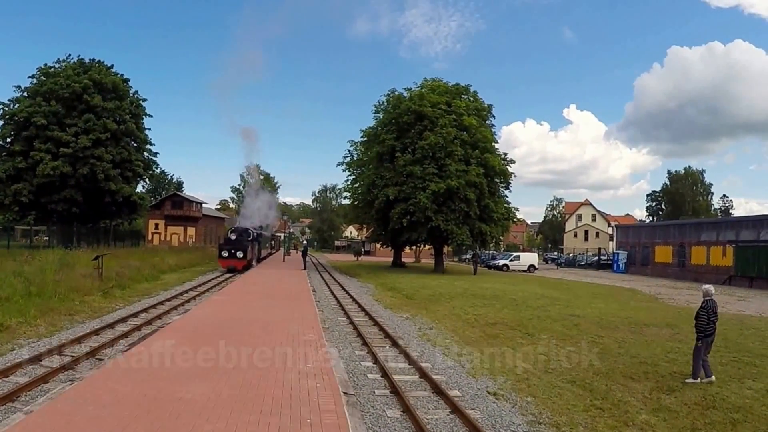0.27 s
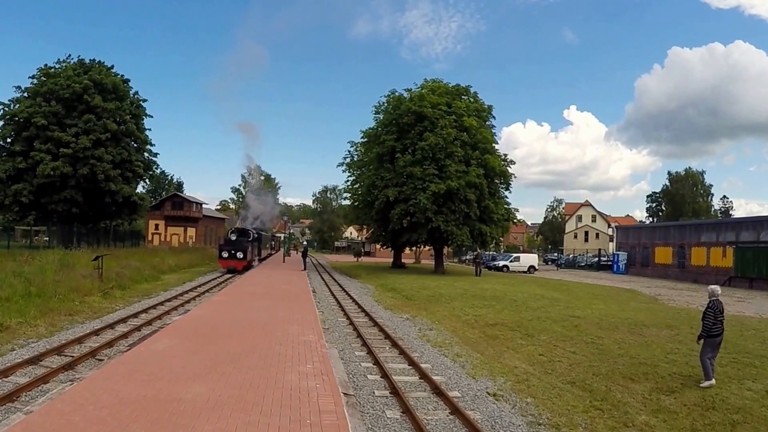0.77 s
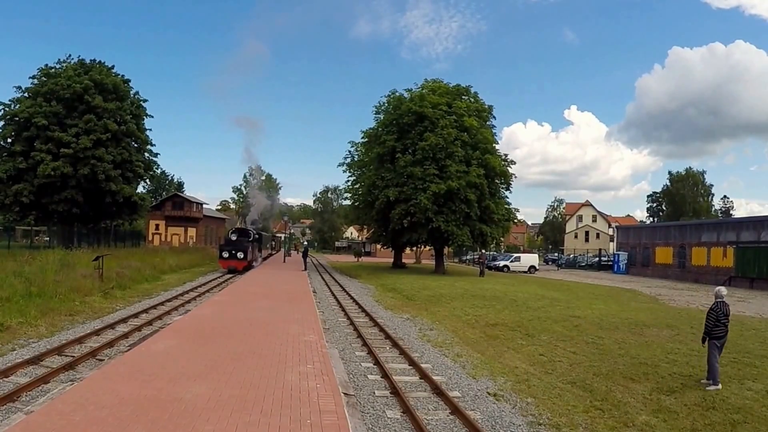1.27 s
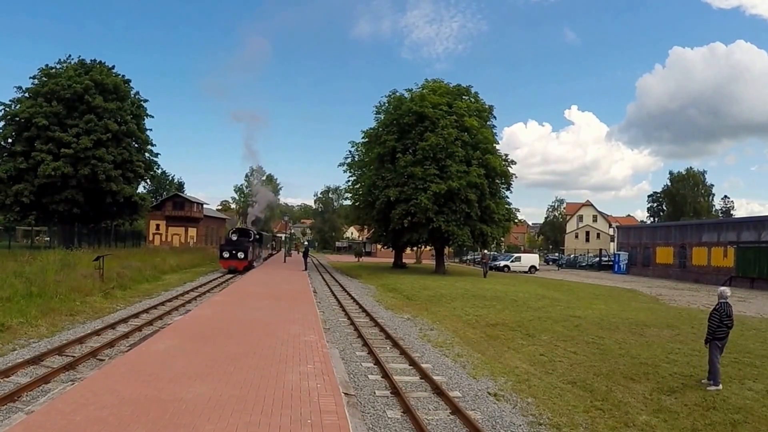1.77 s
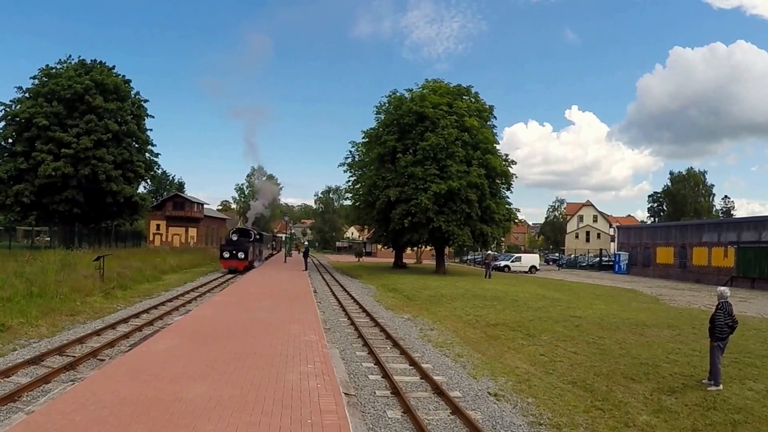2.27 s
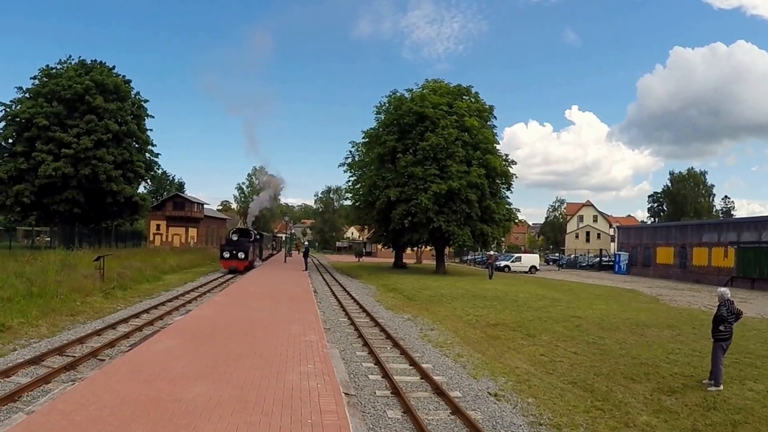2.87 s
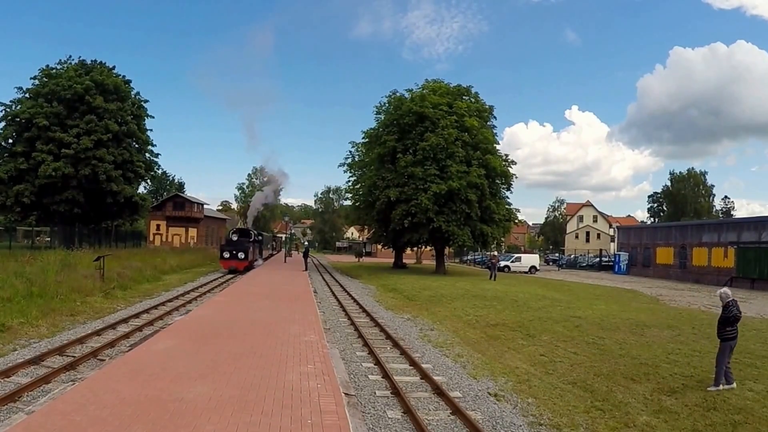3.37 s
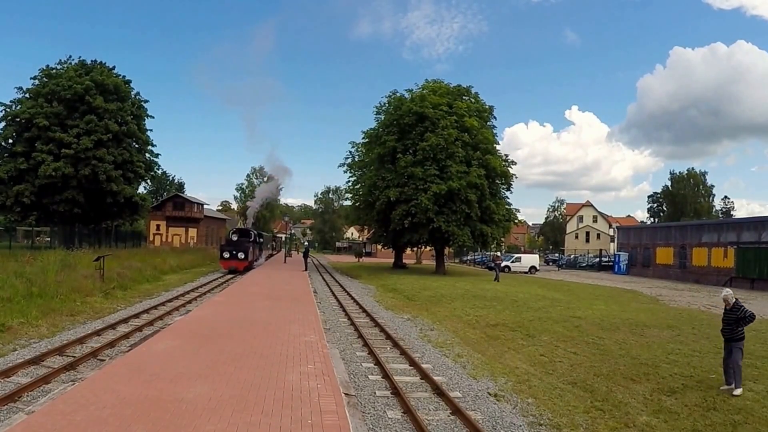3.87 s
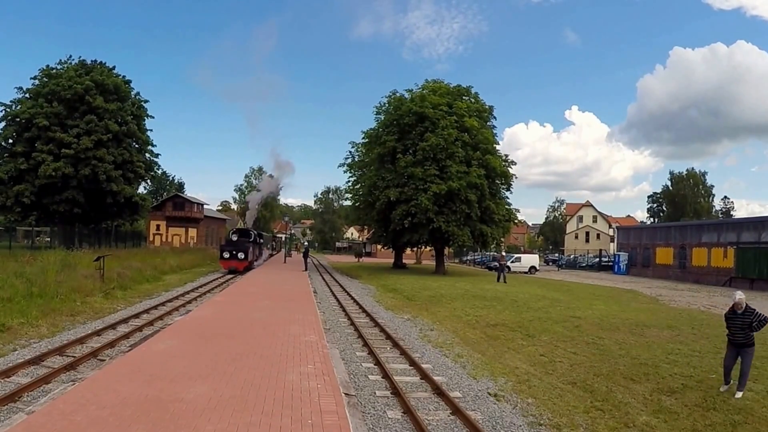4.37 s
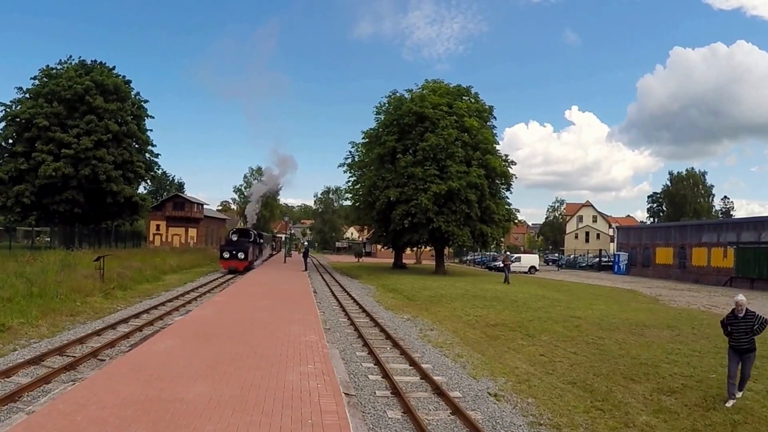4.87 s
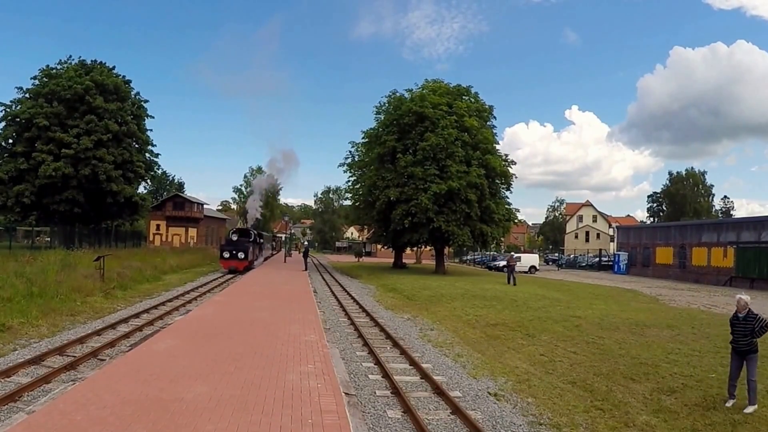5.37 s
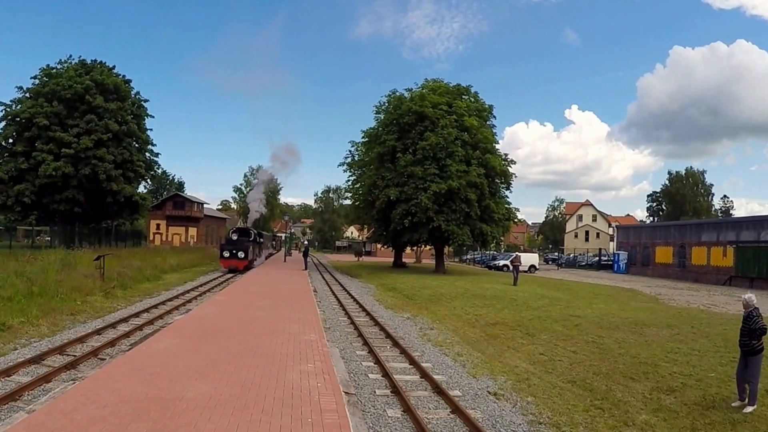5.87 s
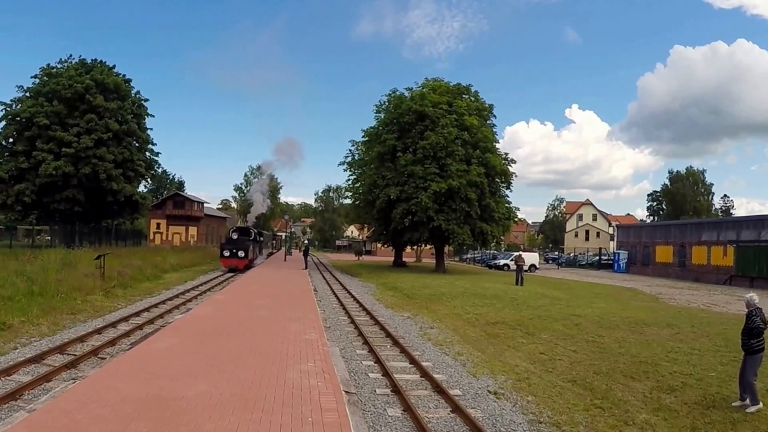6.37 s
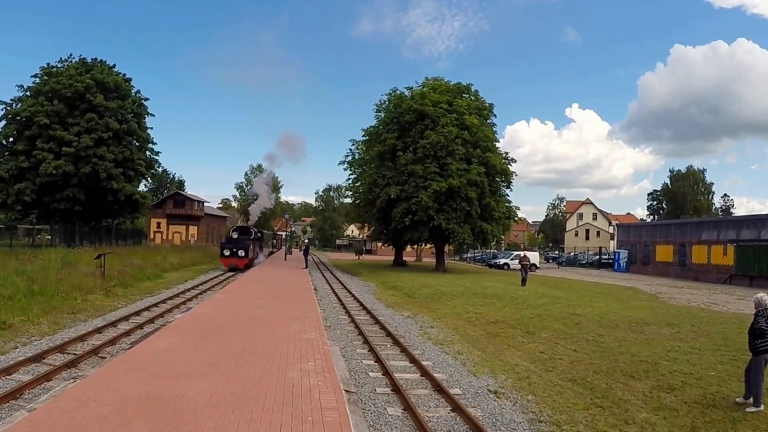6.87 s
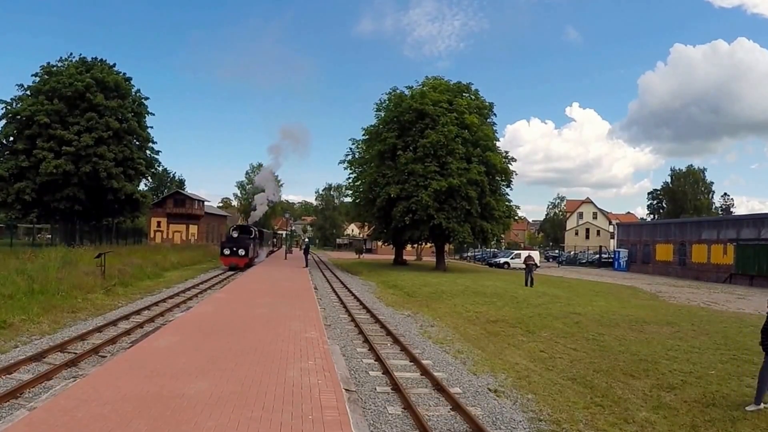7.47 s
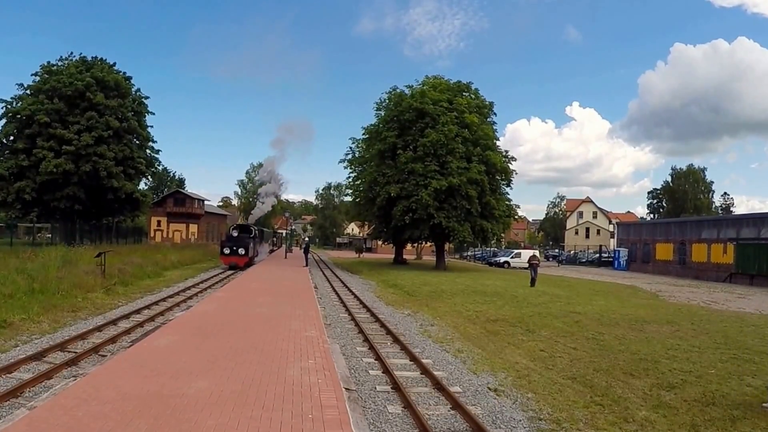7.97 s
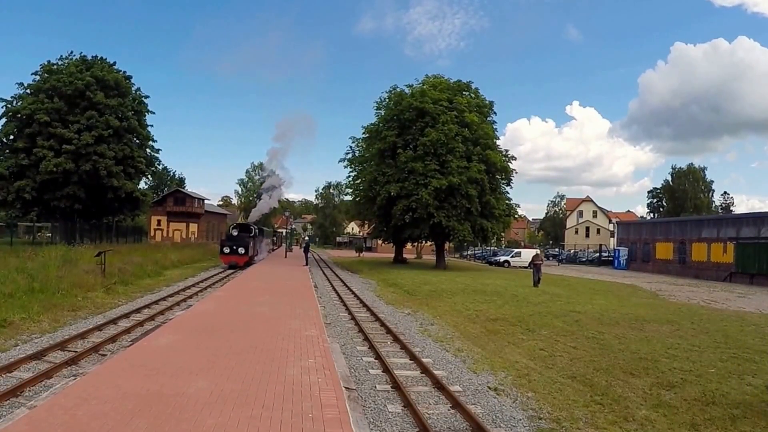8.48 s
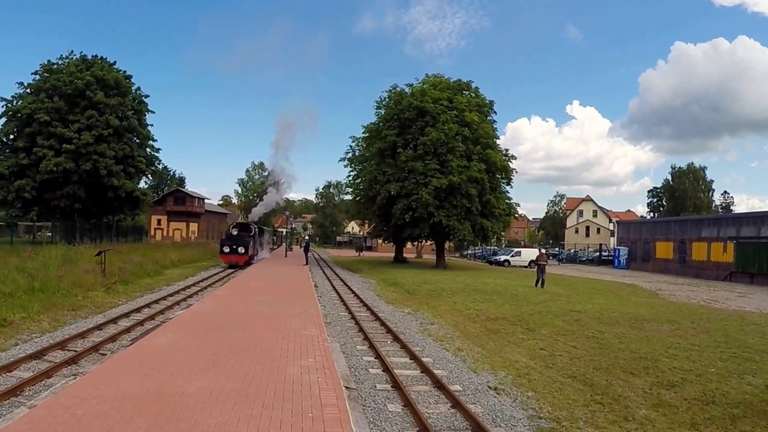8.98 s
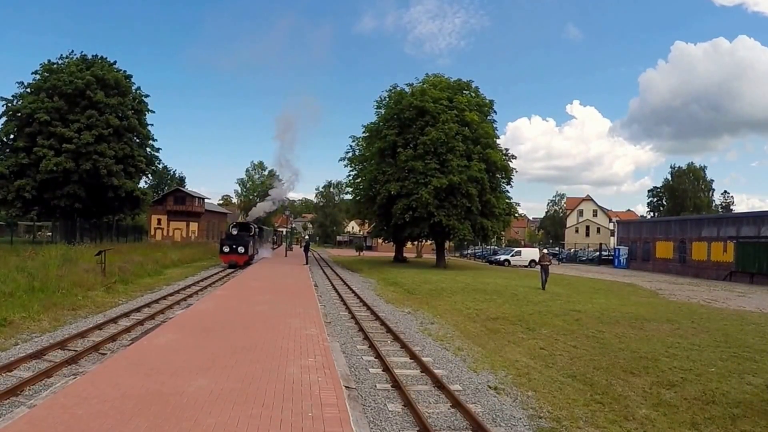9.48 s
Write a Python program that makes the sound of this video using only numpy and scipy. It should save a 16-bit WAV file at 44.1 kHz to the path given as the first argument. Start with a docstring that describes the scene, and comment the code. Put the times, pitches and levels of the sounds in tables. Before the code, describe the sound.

Outdoors at a small country station, strong wind hits an unprotected microphone: deep uneven rumble, fluttering puffs and sharp snaps, worst in the first three seconds, with a hoarse sliding howl near the end of that burst. At the start a far steam whistle's echo fades within a second. Later the wind softens to low thumps, a bird chirps briefly, and the distant locomotive's steady hiss slowly rises.

```python
"""A small country station on a gusty day, with a steam locomotive far down the platform.
Wind on the bare microphone leads: turbulent rumble in noise bands, bright puffs of frozen eddies blown past,
snaps as single pressure pulses, and now and then a rough howl of narrow sliding noise.
Behind it a whistle's echo dies away in resonant noise and jet-noise steam swells as the train rolls nearer.
A bird slurs a few falling sines over a far murmur of shaped noise."""
import sys
import numpy as np
from scipy import signal
from scipy.fft import rfft, irfft, next_fast_len
from scipy.io import wavfile
from scipy.ndimage import uniform_filter1d

SR = 44100
rng = np.random.default_rng(int(sys.argv[2]) if len(sys.argv) > 2 else 0)


def pcm_store(signal):
    """Save signal as 16-bit PCM."""
    levels = np.round(np.clip(np.atleast_2d(signal), -1, 1) * 32767)
    wavfile.write(sys.argv[1], SR, levels.astype(np.int16).T)


N = 429534
REACH_HZ_PER_SPEED = 200    # frequency scale of the eddies [Hz per m/s of air speed]


def from_db(db):
    """Level definition: decibels to amplitude gain."""
    return 10 ** (np.asarray(db) / 20)


def rms_one(x):
    """Normalisation of a signal to unit mean power."""
    return x / np.sqrt(np.mean(x ** 2) + 1e-20)


def in_time(rows):
    """Linear interpolation: each column of a table as one value a sample."""
    times, *columns = np.transpose(rows)
    return [np.interp(np.arange(N) / SR, times, column) for column in columns]


def drift(rate_hz):
    """Low-pass random process: noise through two equal poles with corners at rate_hz, unit power."""
    step = 40   # samples between computed values
    r = np.exp(-2 * np.pi * rate_hz * step / SR)
    white = rng.standard_normal(N // step + 2002)
    slow = signal.lfilter([1], [1, -2 * r, r * r], white)[2000:]    # the filter's start is dropped
    return np.interp(np.arange(N) / step, np.arange(len(slow)), rms_one(slow))


def coloured(points):
    """Spectral shaping: stationary noise with the given spectrum, unit power."""
    size = next_fast_len(N)
    hz = np.maximum(np.arange(size // 2 + 1) * SR / size, 1)
    points_hz, points_db = np.transpose(points)
    gain = from_db(np.interp(np.log(hz), np.log(points_hz), points_db, left=-120, right=-120))
    return rms_one(irfft(rfft(rng.standard_normal(size)) * gain, size)[:N])


def filtered(x, order, hz, kind):
    """Butterworth filtering: flat pass band, with its corner or corners at hz."""
    return signal.sosfilt(signal.butter(order, hz, kind, fs=SR, output="sos"), x)


STEADY_SHARE, STEADY_MAX_SPEED = 0.34, 2.8     # steady flow against eddy speed; upper limit [m/s]


def rumble(lumps_db, gusty):
    """Turbulent pressure on the microphone: faster air carries the noise spectrum to higher frequencies."""
    level_db, speed = air()
    gust = np.tanh(1.01 * drift(24.3) + 0.55 * drift(67.4))
    # faster air comes only as puffs
    steady_speed = np.minimum(STEADY_SHARE * speed, STEADY_MAX_SPEED)
    reach_hz = REACH_HZ_PER_SPEED * steady_speed * np.exp(gusty * gust)
    white = rng.standard_normal((2, N + SR))
    edges = 14 * 2 ** np.arange(0, 8, .5)   # half-octave bands
    out = 0
    for k, (low, high) in enumerate(zip(edges, edges[1:])):
        # neighbouring bands draw on separate noises
        band = filtered(white[k % 2], 3, [low, high], "band")[SR:]
        # the size of the housing keeps the spectrum flat up to 38 Hz
        above_hz = max(np.sqrt(low * high) - 38, 0)
        out = out + band * from_db(-30 * above_hz / reach_hz + lumps_db * drift(10.9))
    # 32 dB makes up for the narrow share of the noise that passes
    return from_db(level_db + 32) * out


# the breeze under the gusts: (time [s], level [dB], air speed [m/s])
BREEZE = [(0, -24.5, 3.25), (3, -26, 3.68), (5, -30, 1.73), (5.2, -30.5, 1.8), (5.36, -32, 0.77),
          (5.7, -28, 1.47), (7.3, -27, 1.7), (7.5, -33, 1.27), (8.6, -30.5, 1.3), (8.95, -28.5, 2.4),
          (9.45, -24, 1.25), (9.6, -38.5, 1.2), (9.74, -29.5, 1.1)]
# gusts at full strength: (start [s], length [s], level [dB], air speed of their eddies [m/s])
GUSTS = [(0, 0.31, -18, 4.96), (0.351, 0.13, -15.5, 7.05), (.56, 0.043, -19, 3.9), (0.617, .16, -19.5, 8.1),
         (0.804, 0.44, -19, 6.8), (1.295, 0.29, -22.5, 8.8), (1.618, 0.41, -21.5, 8.66),
         (2.057, 0.28, -19.5, 4.38), (2.411, 0.23, -19, 4.8), (2.595, .11, -24.5, 11.7),
         (2.757, .08, -22.5, 13), (2.852, 0.23, -19.5, 8.3), (3.137, 0.14, -27, 5.25),
         (3.293, 0.19, -30, 3.1), (3.455, 0.28, -21, 5), (3.769, 0.16, -26.5, 2.7),
         (3.92, 0.099, -22.5, 4.8), (4.044, .37, -21, 3.64), (4.465, 0.18, -22, 2.66),
         (4.692, 0.18, -20.5, 3.2), (4.87, .17, -25, 3.1), (5.045, 0.069, -13.5, 3.06),
         (5.381, 0.28, -21, 4.8), (5.744, 0.07, -17.5, 3.7), (5.857, 0.11, -29.5, 4.3),
         (6.005, 0.18, -17.5, 3.6), (6.327, 0.038, -15, 2.5), (6.452, 0.11, -16, 2.47),
         (6.601, 0.12, -17, 3.2), (6.774, 0.21, -28, 3.3), (7.084, 0.098, -20, 2.15),
         (7.224, 0.16, -13.5, 2.52), (7.614, 0.088, -21.5, 2.9), (7.71, 0.073, -24, 1.9),
         (7.904, .2, -23.5, 2.06), (8.397, 0.18, -21.5, 0.96), (8.739, 0.14, -16.5, 3.27),
         (8.968, 0.42, -17.5, 2.9)]
GUST_RISE_S, GUST_FALL_S = .025, 0.0406     # before the full strength and after it


def air():
    """Addition of powers: gusts rise, hold and fall over the breeze; speed is the power-weighted mean."""
    t = np.arange(N) / SR
    breeze_db, breeze_speed = in_time(BREEZE)
    power = from_db(breeze_db) ** 2
    flow = power * breeze_speed
    for start, length, level_db, speed in GUSTS:
        rise = (t - start) / GUST_RISE_S + 1
        fall = (start + length - t) / GUST_FALL_S + 1
        shape = np.clip(np.minimum(rise, fall), 0, 1)
        gust_power = (from_db(level_db) * shape ** 2) ** 2
        power = power + gust_power
        flow = flow + gust_power * speed
    return 10 * np.log10(power), flow / power


def scattered(gap_s, full_db, db_per_doubling, full_speed, spread_db):
    """Jittered point process: time, level that falls in slower air, air speed and a length factor."""
    lots = rng.standard_normal((int(N / SR / gap_s) - 2, 4))
    times = gap_s * (np.arange(len(lots)) + 1.5 + .5 * np.tanh(lots[:, 0]))
    speed = air()[1][(times * SR).astype(int)]
    # no further rise in level above full_speed
    level_db = full_db + db_per_doubling * np.log2(np.minimum(speed / full_speed, 1))
    level_db = level_db + spread_db * lots[:, 1]
    return times, level_db, speed * np.exp(0.2483 * lots[:, 2]), np.exp(0.297 * lots[:, 3])


# puffs of air at set times, strong and faint:
# (time of centre [s], level [dB], length at half power [s], nominal air speed [m/s])
SET_PUFFS = [(0.023, -8, 0.0094, 6.2), (0.047, -8, 0.0072, 5.5), (0.129, -21.5, 0.034, 5.5),
             (0.197, -16.5, 0.016, 5.1), (0.369, -11.5, .009, 4.1), (0.464, -8.5, 0.013, 3.9),
             (0.657, -14, .012, 8.7), (0.698, -15, .016, 6.9), (0.719, -4.5, 0.0086, 9.3),
             (0.748, -5, 0.016, 4.4), (0.771, -5, 0.0084, 3.4), (0.809, -18, .011, 8.5),
             (0.858, -12, .009, 8.8), (0.988, -12.5, 0.036, 6.05), (1.135, -25, 0.016, 10.5),
             (1.236, -9, .011, 3.93), (1.324, -26, .013, 9.2), (1.479, -8, 0.024, 7.5),
             (1.507, -9.5, 0.0038, 10.5), (1.643, -21, 0.009, 7.4), (1.699, -12, .011, 6.1),
             (1.754, -18, 0.019, 8.2), (1.787, -14.5, 0.02, 10.1), (1.885, -15, 0.0089, 6.2),
             (1.912, -13, .023, 8.2), (2.244, -16, 0.014, 6.2), (2.38, -21, 0.0078, 6),
             (2.537, -8.5, 0.0083, 4.4), (2.611, -11, 0.03, 12.9), (2.653, -11.5, 0.015, 16.9),
             (2.688, -6.5, 0.012, 13.4), (2.712, -8.5, 0.017, 10.9), (2.773, -7, 0.024, 13),
             (2.804, -8.5, 0.032, 12.5), (2.862, -4.5, .021, 6.9), (2.906, -16.5, 0.019, 12.3),
             (2.951, -6, 0.022, 8.8), (2.992, -10, 0.018, 8.4), (3.043, -7, 0.023, 8.35),
             (3.105, -11.5, .015, 8.7), (3.156, -11.5, 0.025, 3.7), (3.194, -11.5, 0.01, 3.7),
             (3.243, -13, .014, 5.36), (3.472, -22, 0.0093, 2.7), (3.505, -10.5, 0.024, 5.6),
             (3.556, -10, 0.021, 4.7), (3.711, -10, .014, 6.65), (3.987, -8, 0.015, 3.97),
             (4.008, -13, 0.016, 4.5), (4.237, -15, .045, 2.4), (4.371, -9.5, .026, 3.25),
             (4.706, -15.5, 0.023, 2.9), (4.8, -12.5, 0.034, 4.2), (4.927, -16, 0.012, 2.76),
             (5.103, -20, 0.0083, 5), (5.385, -25, 0.0071, 3.8), (5.417, -13.5, 0.02, 6.7),
             (5.438, -12, 0.011, 5.2), (5.455, -15, 0.0107, 7.35), (5.491, -12.5, .016, 5.05),
             (5.553, -21, .016, 4.8), (5.583, -24, 0.015, 6.3), (5.622, -17.5, 0.033, 5.9),
             (5.864, -14, 0.017, 5.7), (5.931, -13.5, 0.03, 3.2), (5.975, -14.5, 0.023, 2.34),
             (6.17, -12, .013, 3.92), (6.33, -9, 0.019, 2.93), (6.64, -20, 0.02, 3.16),
             (6.721, -19.5, .026, 4.35), (6.887, -14, 0.014, 2.48), (6.944, -18.5, 0.037, 3.6),
             (7.017, -15, 0.012, 3.3), (7.108, -17, 0.015, 2.9), (7.64, -24, 0.021, 2.76),
             (8.082, -18, .024, 1.55), (8.787, -15, .017, 4), (8.821, -20, 0.0093, 5.5),
             (9.19, -14.5, 0.015, 3.46), (9.252, -27, .017, 2.4), (9.342, -7.5, 0.014, 2.7)]
# chance puffs follow one another unevenly all the time, louder in fast air:
# mean gap [s], mean level in full-speed air [dB], its slope [dB per doubling of speed]
PUFF_GAP_S, PUFF_DB, PUFF_DB_PER_DOUBLING = .019, -19.5, 14.5
# full speed [m/s], spread of levels [dB], median length [s]
PUFF_FULL_SPEED, PUFF_SPREAD_DB, PUFF_S = 5.1, 4, .011


def puffs(swell, jitter, sharp_db, sharp_share):
    """Frozen turbulence: a fixed row of eddies is blown past; pitch and level follow the air speed."""
    out = np.zeros(N)
    fine, size = 32, 2 ** 13    # points per unit of eddy phase; points in the row
    pitch = np.arange(size // 2 + 1) * fine / size      # in units of the reach
    broad = from_db(-45 * pitch ** 1.5) * pitch / (pitch + .1)
    sharp = from_db(sharp_db - 36 * pitch) * pitch / (pitch + .2)
    jerks = np.exp(jitter * np.tanh(drift(78.3)))     # the air speed never holds still
    times, levels_db, speeds, stretch = scattered(
        PUFF_GAP_S, PUFF_DB, PUFF_DB_PER_DOUBLING, PUFF_FULL_SPEED, PUFF_SPREAD_DB)
    chance_puffs = zip(times, levels_db, PUFF_S * stretch, speeds)
    for time, level_db, length, speed in [*SET_PUFFS, *chance_puffs]:
        # dense broad eddies, and among them lone tight ones that crackle
        dense, sizes, lots = rng.standard_normal(size), rng.standard_normal(size), rng.random(size)
        lone = sizes * (lots < sharp_share) / np.sqrt(sharp_share)
        eddies = irfft(rfft(dense) * broad + rfft(lone) * sharp, size)
        half = int(1.05 * length * SR)
        at = round(time * SR) - half + np.arange(2 * half)
        inside = (at >= 0) & (at < N)
        at, bump = at[inside], np.hanning(2 * half)[inside]
        speed_now = speed * jerks[at] * (1 - swell + swell * bump)
        place = np.cumsum(REACH_HZ_PER_SPEED * speed_now) * fine / SR
        passing = np.interp(place % size, np.arange(size), eddies)
        out[at] += from_db(level_db) * rms_one(bump ** .5 * jerks[at] * passing)
    return filtered(out, 2, 90, "high")


# snaps at set times, hard and soft, single swings of the membrane:
# (time [s], peak level [dB], width from peak to zero crossing [ms])
SET_SNAPS = [(0.029, -1, 0.28), (0.1132, -4.5, 0.47), (0.1895, -8, 0.62), (0.3662, -10, .4),
             (0.4354, -1.5, 0.51), (0.6565, -24, .37), (0.7032, 4, 0.31), (0.7456, -15, 0.32),
             (0.8094, -7, 0.4), (0.857, -22, 0.41), (1.033, -4, 0.48), (1.0584, -14, 0.36),
             (1.1143, -8.5, 0.41), (1.3128, -1, .42), (1.355, -4, 0.39), (1.3926, -4.5, 0.35),
             (1.462, -20.5, 0.14), (1.508, -17, .25), (1.537, -13, 0.38), (1.638, -23, 0.48),
             (1.6733, -1, 0.47), (1.7524, -8.5, 0.31), (1.7712, -1, 0.34), (1.7904, -6, 0.38),
             (1.8632, -10, 0.37), (1.894, -6, 0.35), (1.9305, -5, 0.39), (2.0265, -0.5, 0.55),
             (2.379, -10.5, 0.56), (2.5335, -15, 0.38), (2.594, -14, 0.33), (2.606, 6.5, 0.4),
             (2.6836, 7.5, 0.2), (2.742, -6, 0.24), (2.7528, 2, .28), (2.8076, -8, 0.2), (2.8487, -7, .32),
             (2.9083, -9, 0.16), (2.9914, -8, .2), (3.0985, -1, 0.43), (3.546, -16, 0.5),
             (3.711, -15, 0.54)]
# chance snaps come at random, and only fast air makes them heard:
# mean gap [s], mean peak level in full-speed air [dB], its slope [dB per doubling of speed]
SNAP_GAP_S, SNAP_DB, SNAP_DB_PER_DOUBLING = .01, -19, 28
# full speed [m/s], spread of levels [dB], median width [ms]
SNAP_FULL_SPEED, SNAP_SPREAD_DB, SNAP_MS = 6.63, 4, 0.47


def snaps():
    """Impulsive pressure of fast eddies: one narrow peak between two long shallow troughs."""
    out, around = np.zeros(N), np.arange(-300, 300)
    times, levels_db, _, stretch = scattered(
        SNAP_GAP_S, SNAP_DB, SNAP_DB_PER_DOUBLING, SNAP_FULL_SPEED, SNAP_SPREAD_DB)
    chance_snaps = zip(times, levels_db, SNAP_MS * stretch)
    for time, level_db, width_ms in [*SET_SNAPS, *chance_snaps]:
        u = around / (width_ms * SR / 1000)
        pulse = (1 - u ** 2) / (1 + u ** 2) ** 2
        out[round(time * SR) + around] += from_db(level_db) * pulse * np.hanning(len(u))
    return out


# some gusts howl on an edge of the housing:
# (start [s], length [s], start frequency [Hz], end frequency [Hz], level [dB])
HOWLS = [(2.589, 0.14, 625, 588, -28), (2.74, .55, 599, 329.2, -18), (4.19, .22, 261.4, 218.6, -29),
         (4.763, 0.19, 330, 258.4, -27.5), (5.839, .16, 289.3, 239.3, -22), (6.619, 0.14, 301, 261, -29.5),
         (6.909, 0.088, 289, 240, -24.5)]
HOWL_WIDTH_SHARE = 0.079    # corner of the random modulation against the start frequency


def howl(flutter_db):
    """Edge tone as modulated narrow-band noise: it slides down as the gust tires, coming in flaps."""
    out, flaps = np.zeros(N), from_db(flutter_db * drift(25))
    for start, length, from_hz, to_hz, level_db in HOWLS:
        first, count = round(start * SR), int(length * SR)
        at = slice(first, first + count)
        phase = 2 * np.pi * np.cumsum(np.linspace(from_hz, to_hz, count)) / SR
        a, b = (drift(HOWL_WIDTH_SHARE * from_hz)[at] for _ in range(2))
        band = a * np.cos(phase) + b * np.sin(phase)
        out[at] += from_db(level_db) * np.hanning(count) ** 0.31 * band
    return flaps * out


# escaping steam: (time [s], level [dB], extra treble [dB])
STEAM = [(0.03, -63.5, -18), (0.45, -55, -12), (0.9, -50.5, -10), (1.65, -54.5, -11), (2.49, -49, -2.5),
         (3.16, -49, -6.5), (3.52, -45.5, -4), (4.68, -43.5, -4), (6.28, -43, -2.5), (7.2, -40, -1.5),
         (8.6, -38, -1), (9.33, -40, 2.1), (9.55, -41, -1), (9.74, -37, 4.5)]
# spectrum of the steam jet: (frequency [Hz], relative spectral level [dB])
STEAM_COLOUR = [(880, -37), (1500, -10.5), (1770, -10.5), (2250, -2.5), (2700, -2.5), (2860, 0),
                (5150, -2.5), (10000, -11.5), (11300, -17.5), (13400, -18.5), (15000, -23)]


def steam(flicker_db):
    """Jet noise: smooth broadband hiss whose treble grows as the engine comes nearer."""
    level_db, treble_db = in_time(STEAM)
    jet = coloured(STEAM_COLOUR)
    top = filtered(jet, 2, 7000, "high")
    return from_db(level_db + flicker_db * drift(2.5)) * (jet + (from_db(treble_db) - 1) * top)


# whistle tones: (frequency [Hz], width of each of two cascaded resonators [Hz], relative level [dB])
WHISTLE_TONES = [(972, 30, -2), (943, 30, -4), (1560, 60, -19), (1955, 40, -19), (1900, 60, -23)]
# the echo sinks slowly while the blast still arrives, then also dies at the second rate
WHISTLE_DB, WHISTLE_SINK_DB_PER_S, WHISTLE_END_S, WHISTLE_DIE_DB_PER_S = -39, 7, .58, 120


def whistle():
    """Reverberant decay: many echoes blur each tone into a narrow wavering band of resonant noise."""
    out = 0
    for hz, width_hz, level_db in WHISTLE_TONES:
        r = np.exp(-np.pi * width_hz / SR)
        pole = [1, -2 * r * np.cos(2 * np.pi * hz / SR), r * r]
        once = signal.lfilter([1, 0, -1], pole, rng.standard_normal(N + SR))
        tone = signal.lfilter([1], pole, once)[SR:]
        out = out + from_db(level_db) * rms_one(tone)
    t = np.arange(N) / SR
    fade_db = WHISTLE_SINK_DB_PER_S * t + WHISTLE_DIE_DB_PER_S * np.maximum(t - WHISTLE_END_S, 0)
    return from_db(WHISTLE_DB - np.minimum(fade_db, 100) + 1.8 * drift(8.9)) * out


# falling bird notes:
# (start [s], length [s], start frequency [Hz], end frequency [Hz], peak level [dB])
BIRD = [(4.405, .07, 2800, 2550, -48), (4.554, 0.1, 4050, 3500, -51), (4.71, 0.078, 2800, 2360, -49),
        (4.75, .1, 4000, 3550, -58), (5.053, 0.053, 4050, 3800, -44), (5.07, .11, 2900, 2400, -61)]


def bird():
    """Frequency glide: enveloped sines whose pitch slides down linearly."""
    out = np.zeros(N)
    for start, length, from_hz, to_hz, level_db in BIRD:
        first, count = round(start * SR), int(length * SR)
        note = np.sin(2 * np.pi * np.cumsum(np.linspace(from_hz, to_hz, count)) / SR)
        out[first:first + count] += from_db(level_db) * np.sqrt(np.hanning(count)) * note
    return out


# far murmur of train, leaves and street: (time [s], level [dB])
MURMUR = [(0, -41), (1.5, -56.5), (3.1, -51.5), (5, -49.5), (5.75, -46), (6.1, -49.5), (7.6, -47),
          (8.5, -43.5), (9.4, -45), (9.74, -42.5)]
# spectrum of the murmur: (frequency [Hz], relative spectral level [dB])
MURMUR_COLOUR = [(150, 7.5), (300, 0.5), (500, -1), (800, -6), (1300, -4), (1800, -10.5), (2500, -13),
                 (4000, -38.5)]


def murmur(flicker_db):
    """Diffuse background: distant sources merge into one noise of shaped spectrum and wavering level."""
    level_db = in_time(MURMUR)[0] + flicker_db * drift(5.6)
    return from_db(level_db) * coloured(MURMUR_COLOUR)


def scene():
    """Superposition: wind at the microphone over the far station."""
    wind = rumble(lumps_db=3.0, gusty=0.52)
    wind = wind + puffs(swell=0.4015, jitter=0.291, sharp_db=-2.5, sharp_share=.01)
    wind = wind + snaps() + howl(flutter_db=5.0)
    station = steam(flicker_db=0.48) + whistle() + bird() + murmur(flicker_db=1.0)
    return (wind + station)[None]


LIMIT_DB, OVERSHOOT_FALL_DB_PER_S = -4, 26.5    # limiter threshold; decay of the held overshoot
DUCK_SHARE = .6     # dB of gain cut per dB of held overshoot
STOPBAND_HZ = 15400     # the low-pass is 60 dB down from here up


def record(dry):
    """Dynamic range limiting: loud wind ducks everything, with slow recovery; deep bass and top are cut."""
    x = filtered(dry, 2, 27, "high")
    over_db = np.maximum(20 * np.log10(np.abs(x[0]) + 1e-9) - LIMIT_DB, 0)
    # a running maximum against a rising ramp holds each overshoot and lets it fall steadily
    ramp = OVERSHOOT_FALL_DB_PER_S * np.arange(N) / SR
    held_db = uniform_filter1d(np.maximum.accumulate(over_db + ramp) - ramp, size=200)
    x = 1.1 * np.tanh(x * from_db(-DUCK_SHARE * held_db) / 1.1)     # soft clipping
    return signal.sosfilt(signal.cheby2(22, 60, STOPBAND_HZ, fs=SR, output="sos"), x)


dry = scene()
out = record(dry)
pcm_store(out)
```